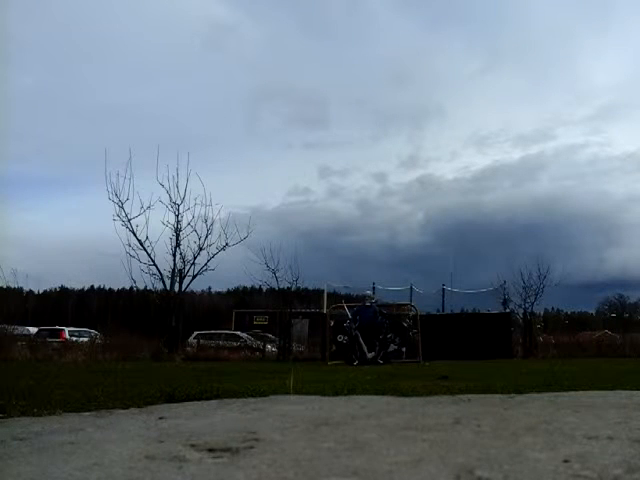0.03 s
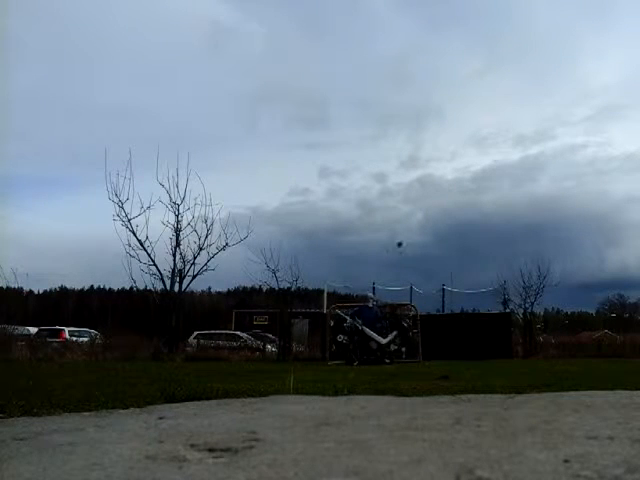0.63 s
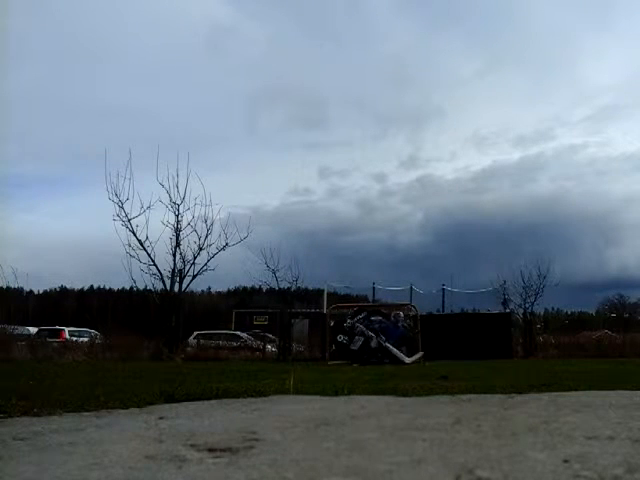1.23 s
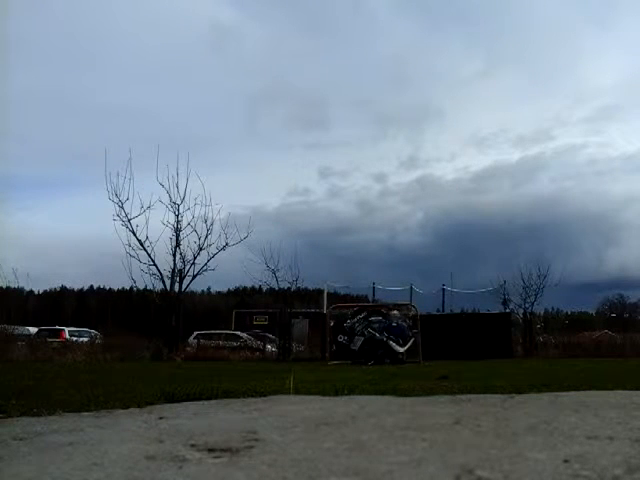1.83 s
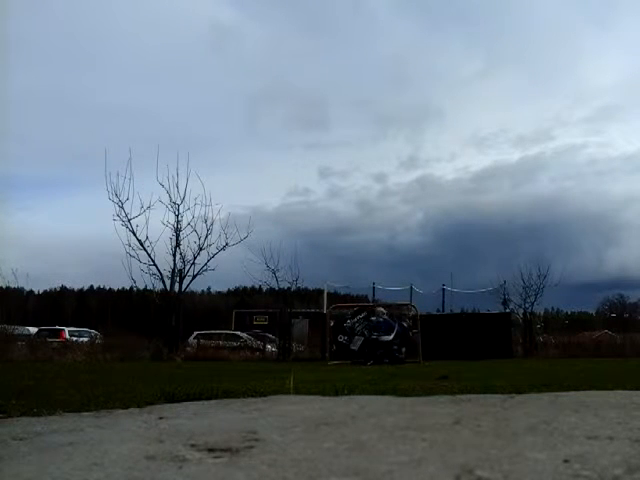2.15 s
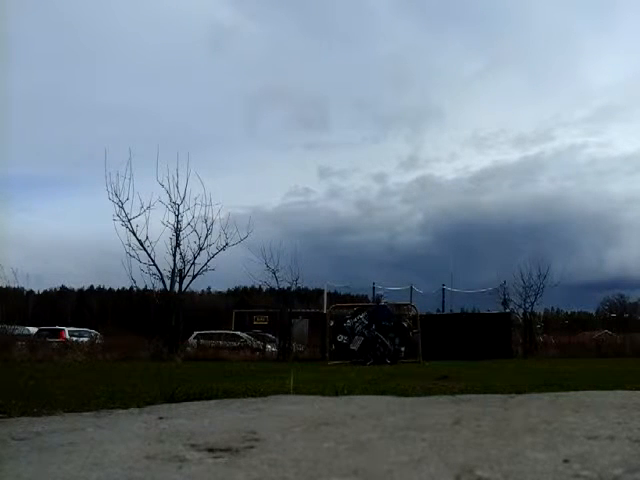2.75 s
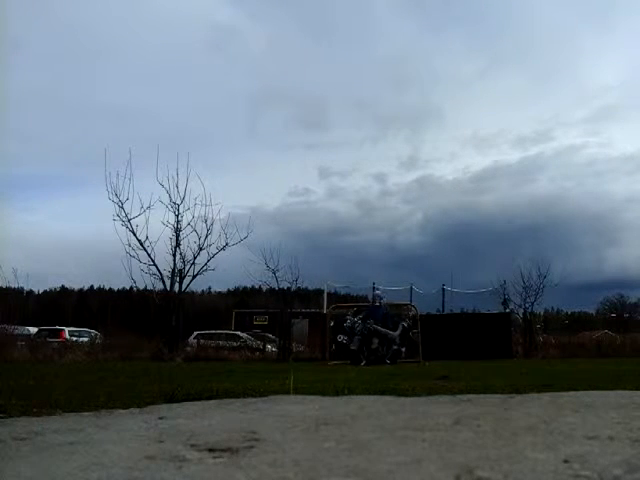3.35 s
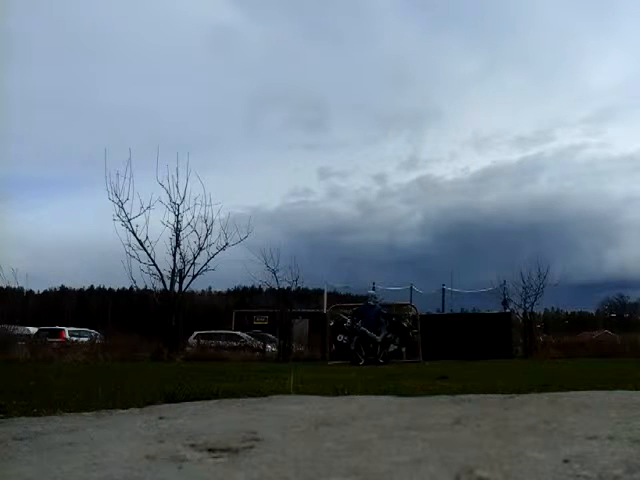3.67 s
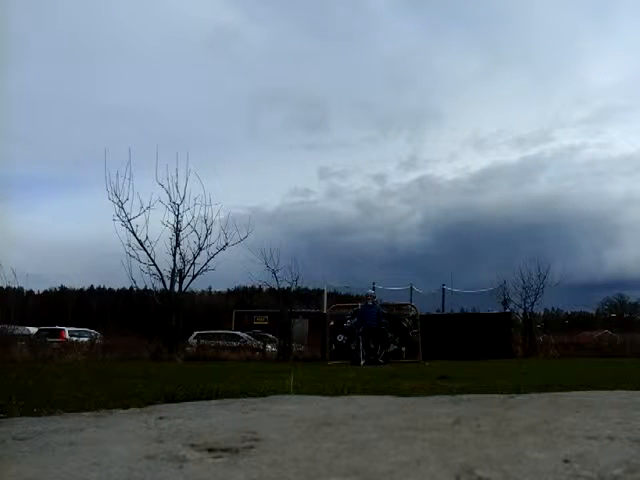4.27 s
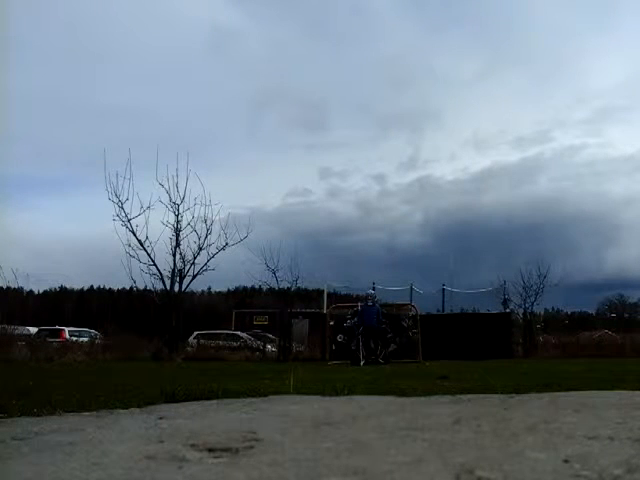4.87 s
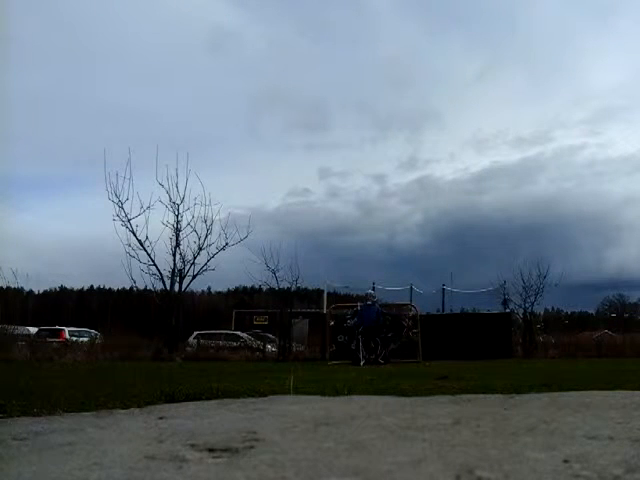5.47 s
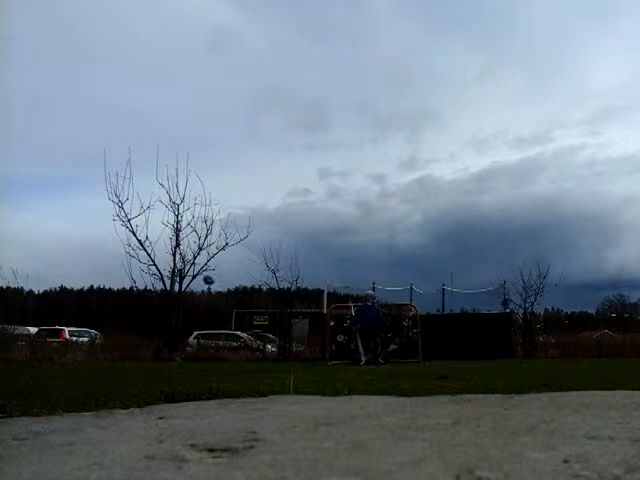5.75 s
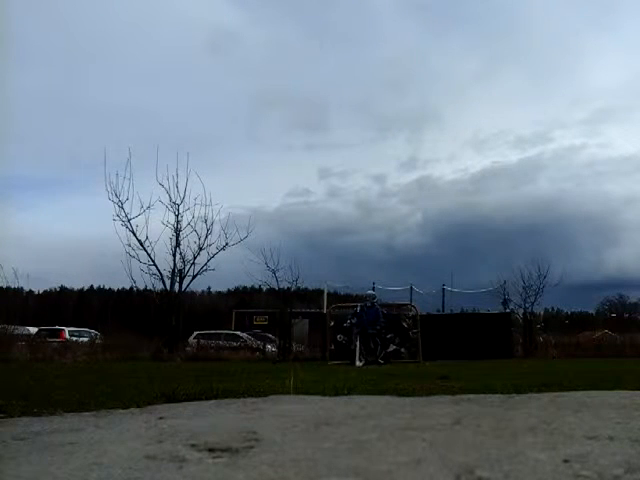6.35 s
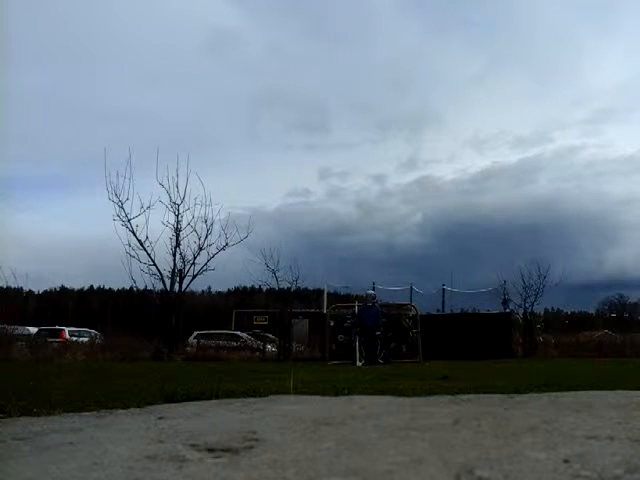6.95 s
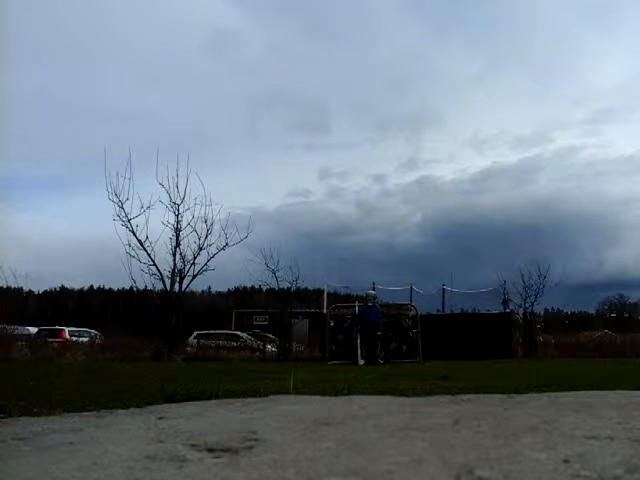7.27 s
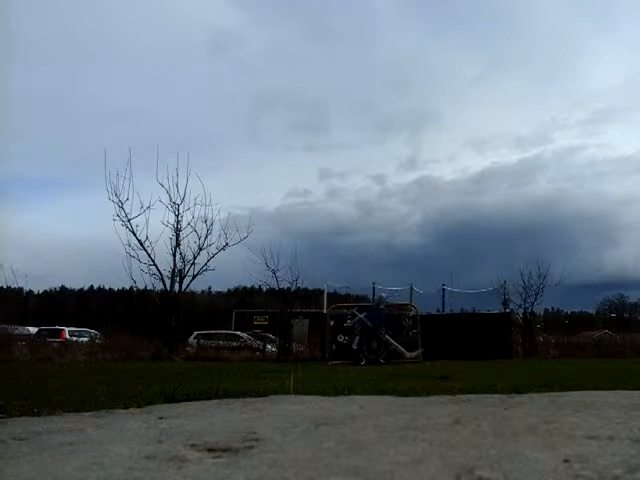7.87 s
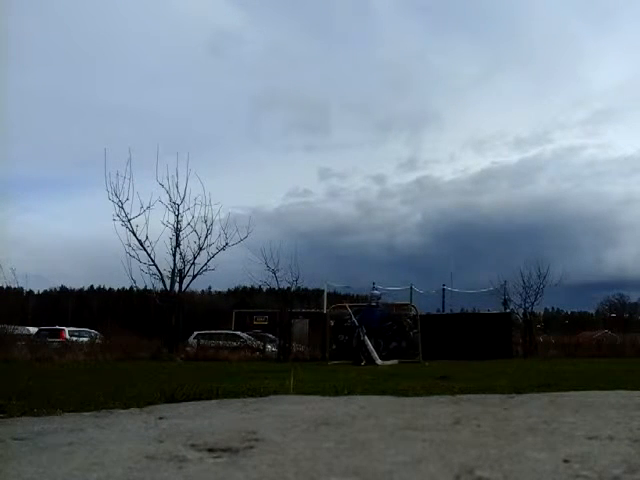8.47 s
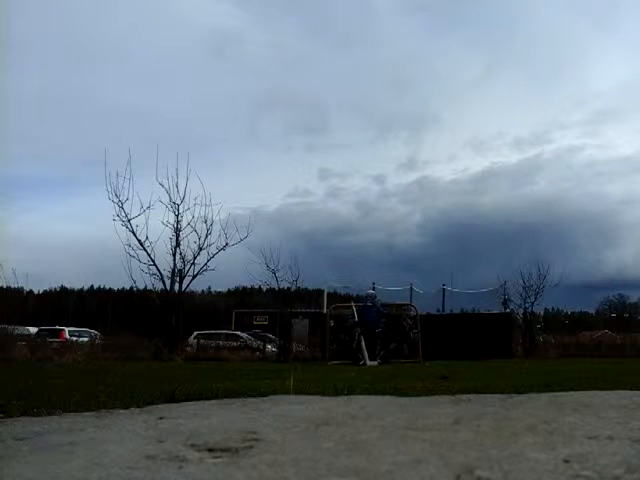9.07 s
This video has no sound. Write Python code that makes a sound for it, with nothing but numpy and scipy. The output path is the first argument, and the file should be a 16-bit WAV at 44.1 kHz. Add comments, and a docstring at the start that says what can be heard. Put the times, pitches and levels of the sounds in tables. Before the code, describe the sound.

Right at the start, a hockey stick sweeps a puck off a plastic shooting board with a loud, close, gritty crack and a faint outdoor echo. Shoes scuff, dull footfalls follow and clothes rustle until about 1.2 seconds. From 1.8 to 3.5 seconds pucks are dropped, tapped and dragged on the hollow board, with knocks, dry stick clacks and a rumbling scrape. A lull holds only soft scuffs and swishes. At about 5.4 seconds, just after a scuff, a sharp slap shot cracks and the stick rings briefly. Quiet steps and rustling follow. From 7.5 to about 9.2 seconds the puck clatters and slides again, a little louder, under quick taps of the blade. A small bird gives thin, high chirps, mostly in the first three seconds and occasionally until 7 seconds, over the faint, even wash of an open field.

```python
"""Outdoor hockey practice.

A stick sweeps, then slaps, a puck off a plastic shooting board close to the microphone. Between the
shots and after them, pucks are dropped, tapped and dragged; shoes thud and scuff. Each blow is a crack
plus a gritty contact ringing in up to four bands. Slides and rustling clothes are filtered grains.
A small bird chirps over the faint wash of the open field."""
import sys
import numpy as np
from scipy import signal
from scipy.io import wavfile
from scipy.ndimage import uniform_filter1d

SR = 44100
rng = np.random.default_rng(int(sys.argv[2]) if len(sys.argv) > 2 else 0)


def waveform_to_disk(signal):
    """Save audio, clipped to [-1, 1], as 16-bit WAV at the path in sys.argv[1]."""
    frames = np.transpose(np.atleast_2d(signal))
    scaled = np.clip(frames, -1, 1) * 32767
    samples = np.round(scaled).astype(np.int16)
    wavfile.write(sys.argv[1], SR, samples)


N = 406161
TIME_S = np.arange(N) / SR

# stick on puck, a sweep and a slap: start_s, contact_s, level_db, hardness_db, extra_snap_db
SHOTS = [(.001, 0.029, -29.5, 6.5, -5.5), (.015, 0.03, -24.5, 4.5, -6.5), (.044, 0.037, -19.5, -4, -8),
         (.072, 0.035, -24.5, -6, -3), (5.392, 0.0018, -22.5, 5, 2.5), (5.4144, 0.00085, -21, 6, 9),
         (5.421, 0.0093, -22, 4, 6), (5.44, 0.014, -28.5, -8, 3.5), (5.498, 0.0091, -36.5, -3, 6)]
# blows: start_s, contact_s, level_db, hardness_db
SCUFFS = [(.138, 0.064, -37.5, -8.5), (.166, 0.056, -37, -5.5), (3.875, 0.064, -51.5, -0.5),
          (4.253, 0.018, -54, 5), (4.67, 0.025, -52, -4.5), (4.694, 0.0026, -50.5, -11.5),
          (4.975, 0.00084, -60.5, -15), (5.276, 0.021, -36, 1.5), (5.335, .039, -49, -1),
          (5.775, 0.068, -50.5, 1.5), (5.965, .1, -59.5, 18.5), (6.61, 0.018, -63.5, 4),
          (7.283, .0005, -66.5, 15)]  # blade and soles on the board
FOOTFALLS = [(.374, 0.0034, -53, -5), (.742, 0.0032, -40.5, 16.5), (.825, 0.0024, -39, -12),
             (.918, 0.021, -38.5, 8), (.952, 0.0097, -33.5, -2), (.99, 0.023, -50, -5),
             (5.011, 0.0045, -43.5, -6), (6.207, 0.0028, -60.5, 7.5), (6.36, 0.006, -56, -4.5),
             (6.411, 0.012, -53, 10.5), (7.129, 0.0097, -56, -6)]
KNOCKS = [(1.769, 0.01, -28.5, 0.5), (1.786, 0.043, -26, -3), (1.8693, 0.00013, -26.5, 1),
          (1.912, 0.027, -38.5, 0), (1.981, 0.0068, -33.5, -7.5), (2.031, 0.01, -32, -3),
          (2.075, 0.0071, -38.5, -7), (2.118, 0.0088, -48.5, 12.5), (2.155, 0.0027, -43.5, 1.5),
          (2.233, 0.034, -32.5, -2), (2.293, 0.032, -34, -4.5), (2.423, 0.0048, -39.5, -11),
          (2.476, 0.0077, -44.5, -21), (2.502, 0.0038, -46.5, -7), (2.63, 0.018, -42, 4.5),
          (2.654, 0.0043, -40, 7), (2.684, 0.02, -39.5, 12), (2.75, 0.017, -56, -13), (2.83, 0.022, -47, 3),
          (2.893, 0.019, -47.5, -4), (3.03, 0.019, -45, -14.5), (3.132, 0.021, -39, -12.5),
          (3.217, 0.006, -43.5, -14.5), (3.29, 0.031, -44, -10), (3.355, 0.037, -40, -12),
          (3.422, 0.0081, -35, -7.5), (7.531, .008, -39.5, -2), (7.583, 0.0054, -42.5, -14.5),
          (7.624, 0.0053, -40, -10), (7.816, 0.0094, -31, -6), (7.848, .006, -22, 2.5),
          (7.882, 0.019, -32, -9), (7.971, 0.0081, -32, -5), (7.986, 0.015, -31.5, -8.5),
          (8.088, 0.019, -34.5, -9.5), (8.115, 0.052, -34, -13.5), (8.225, .02, -44, -10.5),
          (8.29, 0.019, -38.5, -14.5), (8.349, 0.012, -27, 2.5), (8.405, 0.046, -37, -11),
          (8.519, 0.013, -40.5, -15), (8.598, 0.015, -30, -0.5), (8.635, .02, -33, -6.5),
          (8.681, 0.019, -28, 4), (8.7, 0.022, -24.5, -1.5), (8.78, 0.0095, -27, -3),
          (8.858, 0.015, -37, 6), (9.052, 0.015, -34, -6), (9.063, .007, -35, 1), (9.19, 0.011, -61.5, -37)]  # puck and blade on the board
CLACKS = [(1.7738, 0.0017, -38, 17.5), (2.676, .0003, -23, 4), (2.742, 0.026, -32.5, -3),
          (2.78, 0.031, -35.5, 2), (7.624, 0.0014, -40.5, -24), (7.757, 0.0013, -46, -1),
          (7.848, 0.0041, -28.5, 13.5), (7.949, 0.00086, -46, 11.5), (8.045, 0.006, -39.5, -2),
          (8.3105, 0.0067, -29, -5)]  # blade on puck, clear of the board
# field wash: time_s, level_db
WASH_LEVELS = [(0, -58.5), (1.3, -62), (3.6, -62), (4.1, -64), (5.3, -61), (5.7, -68.5), (6.1, -74),
               (6.3, -74), (6.6, -66.5), (7.1, -65.5), (9.21, -56)]
# swishes of clothes and soles: peak_s, length_s, relative_db, brightness_db
SWISHES = [(0.422, 0.31, -54, -9), (0.663, 0.47, -51, -6.5), (.92, 0.35, -55, -9), (1.092, 0.22, -57, -5),
           (1.6, 0.28, -64.5, 1.5), (2.223, 0.11, -46, -11), (3.744, 0.45, -62, -10.5),
           (4.578, 0.57, -57, -7.5), (4.845, 0.42, -59, -9), (5.26, 0.36, -64.5, -4),
           (5.9, 0.25, -66.5, -2.5), (6.454, 0.2, -58.5, -3.5), (6.567, 0.25, -65.5, -3),
           (7.234, 0.34, -58.5, -9.5), (7.39, 0.17, -73, 5)]
# bird calls: start_s, level_db, pitch_hz
CHIRPS = [(.277, -57, 5180), (.598, -44, 5220), (.682, -54, 5000), (.827, -45, 5160), (1.148, -53, 4950),
          (1.343, -52.5, 5150), (2.122, -51, 4890), (2.592, -50, 5090), (4.138, -50, 5060),
          (5.073, -63, 4940), (6.553, -54, 5040), (6.997, -56, 5060)]
# puck and blade sliding, one list per slide: time_s, relative_rumble_db, relative_hiss_db
SLIDES = [
    [(1.8, -43, -61), (1.946, -33, -60), (2.06, -40, -57), (2.292, -46.5, -64), (2.5, -35.5, -54),
     (2.698, -44.5, -49), (2.964, -44.5, -51.5), (3.304, -47.5, -51), (3.5, -70, -54)],
    [(7.55, -52, -66), (7.734, -52, -68), (7.886, -28.5, -45), (8.002, -39.5, -69), (8.122, -49.5, -60),
     (8.39, -41, -89), (8.53, -42, -57), (8.76, -30, -67), (9.21, -50, -65)],
]

# source spectra: freq_hz, gain_db
SHOT_EQ = [(30, -53), (200, -23.5), (380, -10), (620, 4), (1400, -8.5), (2600, -10.5), (3300, -11),
           (6800, -6), (9000, -19.5), (14000, -35)]
FIELD_EQ = [(20, -17), (45, -5.5), (80, 0), (160, 1), (350, -2.5), (1100, -4), (1900, -9), (3300, -14),
            (6500, -15.5), (9000, -21), (14000, -25.5)]
SCUFF_EQ = [(60, -12.5), (300, -5), (600, -6.5), (1200, -1.5), (3200, -5), (6800, 1.5), (9000, -5.5),
            (11000, -20.5), (14000, -31)]
STEP_EQ = [(25, -22.5), (60, -8.5), (110, 1.5), (180, 0.5), (330, -5), (600, -17.5), (1500, -33.5),
           (5000, -54)]
BRUSH_EQ = [(40, -12), (150, -3), (400, -4.5), (700, 1.5), (1100, 2), (2000, -6.5), (3500, -18),
            (7000, -11), (14000, -25)]
HISS_EQ = [(500, -19), (2000, 4.5), (4500, -1.5), (6900, 4), (7800, -2.5), (9500, -3.5), (11000, -19.5),
           (14000, -13)]
KNOCK_EQ = [(25, -39.5), (60, -27.5), (130, -4.5), (310, -0.5), (600, 4.5), (1700, -8.5), (2700, -13.5),
            (3600, -20), (6800, -24.5), (10000, -38.5), (14000, -53)]
SLIDE_EQ = [(25, -55), (100, -18), (200, -3), (330, -2.5), (560, 1.5), (800, -2.5), (1900, -12.5),
            (3500, -20.5), (7000, -43), (14000, -63)]
# resonances: centre_hz, width_hz, lift_db
STICK_MODES = [(696, 25, 3.5), (846, 40, 3), (1000, 58, 1.9), (1520, 22, 11), (2130, 310, 4.6),
               (2620, 190, 2.4), (4230, 57, 5.7)]
FIELD_MODES = [(840, 120, 2), (1150, 110, 1.5), (1757, 110, 7), (6800, 310, 5)]
BOARD_MODES = [(217, 20, 6), (307.7, 57, 9), (466, 96, 2.5), (583, 114, 2), (1090, 210, 3),
               (1640, 190, 5.5), (1860, 87, 2.5)]

# limits of the thump, body, clack and snap bands: edge_hz
BAND_EDGES_HZ = [20, 450, 1200, 3200, 16000]
# unrung part of a blow, per band: base_share
DIRECT_SHARES = [0.27, 0.067, 0.22, .4]
# split of a blow, one row per band from thump up: offset_db, db_per_hardness_db
SHOT_SPLIT = [(-12, -0.83), (-2, -0.01), (-2, 1.06), (-11, 0.13)]
SCUFF_SPLIT = [(-15.5, -.55), (-4, -0.6), (-2.5, 0.28), (0, 0.56)]
STEP_SPLIT = [(-1.5, 0.073), (-16.5, 0.64)]
KNOCK_SPLIT = [(-0.5, -0.54), (1.42, 0.16), (-0.05, 0.52), (-13, 0.85)]
CLACK_SPLIT = [(-34, -0.086), (-12, -.5), (-2.5, 0), (-19.5, 1.13)]
# ring time per band: t60_s
SHOT_T60_S = [0.11, 0.12, 0.22, 0.15]
KNOCK_T60_S = [0.15, 0.15, 0.13, 0.16]
SOFT_T60_S = [0.18, 0.12, 0.26, 0.24]
# crack share against contact time: floor_share, falloff_s
SHOT_CRACK, KNOCK_CRACK, SOFT_CRACK = (0.13, 0.0019), (0.18, 0.003), (0.049, 0.0053)

BANDS = [signal.butter(3, edges_hz, "band", fs=SR, output="sos")
         for edges_hz in zip(BAND_EDGES_HZ, BAND_EDGES_HZ[1:])]


def gain(db):
    """Decibels to amplitude."""
    return 10 ** (np.asarray(db) / 20)


def unit_rms(x):
    """Scale to rms 1."""
    return x / np.sqrt(np.mean(x ** 2) + 1e-20)


def unit_energy(x):
    """Scale to energy 1."""
    return x / np.sqrt(np.sum(x ** 2) + 1e-20)


def add(mix, start_s, sound):
    """Mix in place."""
    part = mix[max(round(start_s * SR), 0):][:len(sound)]
    part += sound[:len(part)]


def convolve(x, response):
    """Convolve, keeping the length."""
    return signal.oaconvolve(x, response)[:len(x)]


def impulse_response(eq, modes=(), size=4096):
    """Minimum-phase response of a smooth spectrum plus resonances."""
    freq_hz = abs(np.fft.fftfreq(size, 1 / SR))
    knot_hz, knot_db = np.transpose(eq)
    db = np.interp(np.log(freq_hz + 1), np.log(knot_hz + 1), knot_db)
    for centre_hz, width_hz, lift_db in modes:
        db += lift_db / (1 + (2 * (freq_hz - centre_hz) / width_hz) ** 2)
    log_spectrum = np.conj(signal.hilbert(np.log(gain(db))))
    return np.fft.ifft(np.exp(log_spectrum)).real[:size // 2]


def drift(rate_hz):
    """Slow random wander."""
    knots = rng.standard_normal(4096)
    return np.interp(TIME_S * rate_hz, np.arange(len(knots)), knots)


def grit(count, spread_db):
    """Tiny collisions of uneven size."""
    push, size = rng.standard_normal((2, count))
    return push * gain(spread_db * np.clip(size, -2, 2))


def energy_decay(t, t60_s):
    """Energy of a dying vibration, summing to 1."""
    return unit_energy(np.exp(-np.log(1000) * t / t60_s)) ** 2


def split_bands(rows, split, crack_law):
    """Briefer contacts crack more cleanly. Rows out: start_s, contact_s, crack_share, *bands_db."""
    offset_db, slope = np.transpose(split)
    floor_share, falloff_s = crack_law
    hits = []
    for start_s, contact_s, level_db, hardness_db, *_ in rows:
        crack_share = floor_share + (1 - floor_share) * np.exp(-contact_s / falloff_s)
        hits.append((start_s, contact_s, crack_share, *(level_db + offset_db + hardness_db * slope)))
    return hits


def contact_force(t, contact_s, crack_share, grit_db):
    """An impulse, then grit under a pressure that builds faster than it releases."""
    progress = np.minimum(t / contact_s, 1)
    pressure = np.sqrt(np.clip(np.sin(np.pi * progress ** 0.64), 0, 1))
    force = np.sqrt(1 - crack_share) * unit_energy(pressure * grit(len(t), grit_db))
    force[0] += np.sqrt(crack_share)
    return force


def blows(hits, response, ring_t60_s, ring_share, damped_t60_s, grit_db, tick_db=-np.inf, roaming=0):
    """Contacts drive dense modes; part dies on the turf, part rings on. Roaming varies the modes."""
    count, level_window_s = 14000, 0.02
    t, out = np.arange(count) / SR, np.zeros(N)
    mode_decay = 0.6 * np.sqrt(energy_decay(t, t60_s=0.07))
    damped = (1 - ring_share) * energy_decay(t, damped_t60_s)
    shared_modes = np.sqrt(1 - roaming) * rng.standard_normal(count)
    for start_s, contact_s, crack_share, *bands_db in hits:
        fine_modes = mode_decay * (shared_modes + np.sqrt(roaming) * rng.standard_normal(count))
        fine_modes[0] = 1
        force = contact_force(t, contact_s, crack_share, grit_db)
        direct_shares = np.array(DIRECT_SHARES) + 0.16 * crack_share ** 2  # clean hits ring less
        blow = np.zeros(count)
        for band, level_db, t60_s, direct in zip(BANDS, bands_db, ring_t60_s, direct_shares):
            energy = convolve(force ** 2, damped + ring_share * energy_decay(t, t60_s))
            vibration = rng.standard_normal(count) * np.sqrt(abs(energy))
            ringing = unit_energy(convolve(vibration, fine_modes))
            motion = np.sqrt(direct) * force + np.sqrt(1 - direct) * ringing
            blow += gain(level_db) * unit_energy(signal.sosfilt(band, convolve(motion, response)))
        edge_contact = grit(count, spread_db=3) * np.exp(-t / 0.0004)
        tick = unit_energy(signal.sosfilt(BANDS[-1], edge_contact))
        blow += crack_share * gain(bands_db[-1] + tick_db) * tick
        add(out, start_s, blow * np.sqrt(level_window_s * SR))
    return out


def rubbing(strokes, column, response, grit_db, flutter_db):
    """Friction: dense grains whose level follows one column of each stroke."""
    envelope = np.zeros(N)
    for stroke in strokes:
        time_s, level_db = np.transpose(stroke)[[0, column]]
        envelope += gain(np.interp(TIME_S, time_s, level_db, left=-np.inf, right=-np.inf))
    grains = grit(N, grit_db) * gain(flutter_db * drift(rate_hz=60))
    return uniform_filter1d(envelope, size=600) * unit_rms(convolve(grains, response))


def field_wash():
    """Distant noise of the field; it dips after the second shot."""
    wash = unit_rms(convolve(rng.standard_normal(N), impulse_response(FIELD_EQ, FIELD_MODES)))
    level_db = np.interp(TIME_S, *np.transpose(WASH_LEVELS))
    return wash * gain(level_db + 0.63 * drift(rate_hz=13))


def shots():
    """The blade sweeps or slaps the board and whips the puck away; the shaft rings."""
    hits = np.array(split_bands(SHOTS, SHOT_SPLIT, SHOT_CRACK))
    hits[:, -1] += [extra_snap_db for *_, extra_snap_db in SHOTS]
    return blows(hits, impulse_response(SHOT_EQ, STICK_MODES), SHOT_T60_S,
                 ring_share=0.69, damped_t60_s=0.051, grit_db=6.5, tick_db=-15)


def yard_echo(x, rise_s=0.074, decay_s=0.088, count=30000):
    """Scatter from ground, fence and trees."""
    t = np.arange(count) / SR
    tail = rng.standard_normal(count) * (1 - np.exp(-t / rise_s)) * np.exp(-t / decay_s)
    treble_tilt = impulse_response([(100, -9), (1200, -3.5), (4000, -2.5), (12000, 2.5)])
    return convolve(x, unit_energy(convolve(tail, treble_tilt)))


def feet():
    """Dull footfalls through the ground; bright scuffs of soles and blade on the board."""
    step_hits = split_bands(FOOTFALLS, STEP_SPLIT, SOFT_CRACK)
    thuds = blows(step_hits, impulse_response(STEP_EQ), SOFT_T60_S,
                  ring_share=0.25, damped_t60_s=0.041, grit_db=2)
    scuff_hits = split_bands(SCUFFS, SCUFF_SPLIT, SOFT_CRACK)
    scuffs = blows(scuff_hits, impulse_response(SCUFF_EQ, FIELD_MODES), SOFT_T60_S,
                   ring_share=0.23, damped_t60_s=0.035, grit_db=1.5)
    return thuds + scuffs


def rustles(edge_drop_db=22):
    """Cloth brushes cloth, soles brush grass; each swish swells and fades in one arch."""
    position = np.linspace(-1, 1, 9)
    strokes = []
    for peak_s, length_s, relative_db, brightness_db in SWISHES:
        time_s = peak_s + position * length_s / 2
        arch_db = relative_db - edge_drop_db * position ** 2
        strokes.append(np.transpose([time_s, arch_db, arch_db + brightness_db]))
    brush = rubbing(strokes, 1, impulse_response(BRUSH_EQ, FIELD_MODES), grit_db=4, flutter_db=0.9)
    hiss = rubbing(strokes, 2, impulse_response(HISS_EQ), grit_db=5.5, flutter_db=2.5)
    return gain(-2.5) * brush + gain(5) * hiss


def bird(rise_s=0.002, decay_s=0.022, settle_s=0.006, octave_db=-18, trees_db=-2, trees_decay_s=0.084):
    """Thin chirps start sharp and rough, settle at once and linger among the trees."""
    count = 18000
    t, out = np.arange(count) / SR, np.zeros(N)
    for start_s, level_db, pitch_hz in CHIRPS:
        waver = unit_rms(uniform_filter1d(rng.standard_normal(count), size=24))
        onset_bend = (0.02 + 0.11 * waver) * np.exp(-t / settle_s)
        freq_hz = pitch_hz * (1 + 0.009 * waver + onset_bend)
        phase = 2 * np.pi * np.cumsum(freq_hz) / SR
        envelope = (1 - np.exp(-t / rise_s)) * np.exp(-t / decay_s)
        note = envelope * (np.sin(phase) + gain(octave_db) * np.sin(2 * phase))
        trees = unit_energy(rng.standard_normal(count) * np.exp(-t / trees_decay_s))
        echo = np.linalg.norm(note) * unit_energy(convolve(note, trees))
        add(out, start_s, gain(level_db) * (note + gain(trees_db) * echo))
    return out


def board_knocks():
    """Hard rubber and blade strike the hollow plastic board at varying spots."""
    hits = split_bands(KNOCKS, KNOCK_SPLIT, KNOCK_CRACK)
    return blows(hits, impulse_response(KNOCK_EQ, BOARD_MODES), KNOCK_T60_S,
                 ring_share=0.79, damped_t60_s=0.0083, grit_db=7.5, roaming=0.85)


def stick_clacks():
    """Blade on puck: a dry, woody clack of the stick alone."""
    hits = split_bands(CLACKS, CLACK_SPLIT, KNOCK_CRACK)
    return blows(hits, impulse_response(SHOT_EQ, STICK_MODES), KNOCK_T60_S,
                 ring_share=0.41, damped_t60_s=0.028, grit_db=7, tick_db=-14)


def puck_slides():
    """Grit under a sliding puck rattles the board and hisses."""
    rumble = rubbing(SLIDES, 1, impulse_response(SLIDE_EQ, BOARD_MODES), grit_db=6.5, flutter_db=1.5)
    hiss = rubbing(SLIDES, 2, impulse_response(HISS_EQ), grit_db=0, flutter_db=-2)
    return gain(-3) * rumble + gain(-2.5) * hiss


def scene():
    """Mono mix: close play, its faint echo (strongest for shots) and the field."""
    cracks = shots()
    clatter = board_knocks() + stick_clacks() + feet() + puck_slides()
    echo = yard_echo(gain(-26) * cracks + gain(-30) * clatter)
    return (cracks + clatter + echo + rustles() + field_wash() + bird())[None]


def record(dry):
    """Soft microphone overload on the hardest cracks, then a low-pass."""
    ceiling, cutoff_hz = 0.9, 14450
    clipped = dry / (1 + (dry / ceiling) ** 4) ** (1 / 4)
    lowpass = signal.firwin(255, cutoff_hz, window=("kaiser", 9), fs=SR)
    return signal.oaconvolve(clipped, lowpass[None], "same")


dry = scene()
out = record(dry)
waveform_to_disk(out)
```